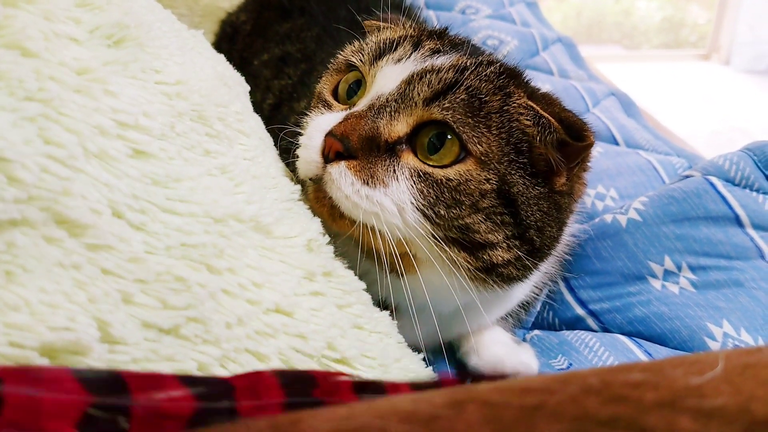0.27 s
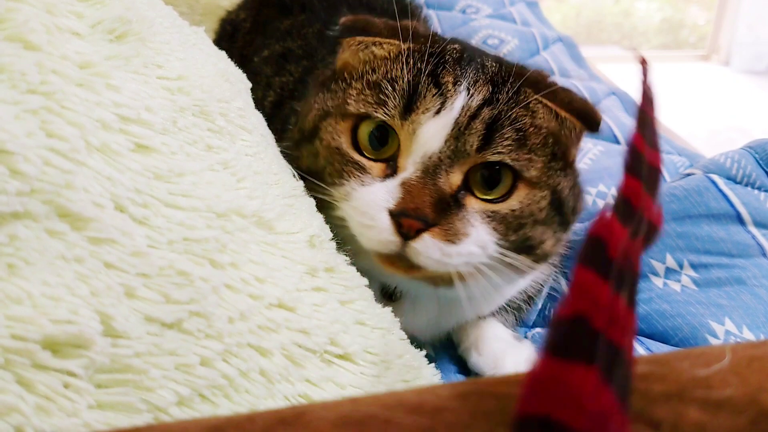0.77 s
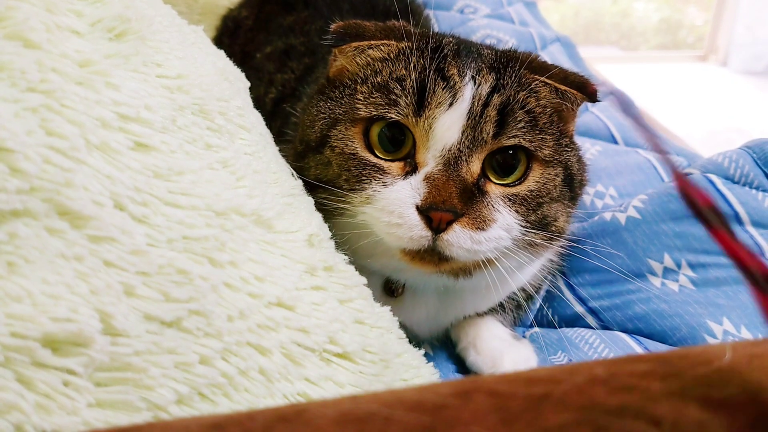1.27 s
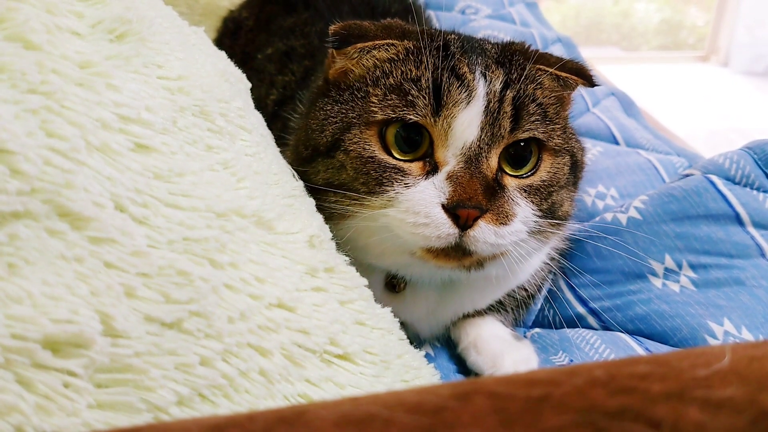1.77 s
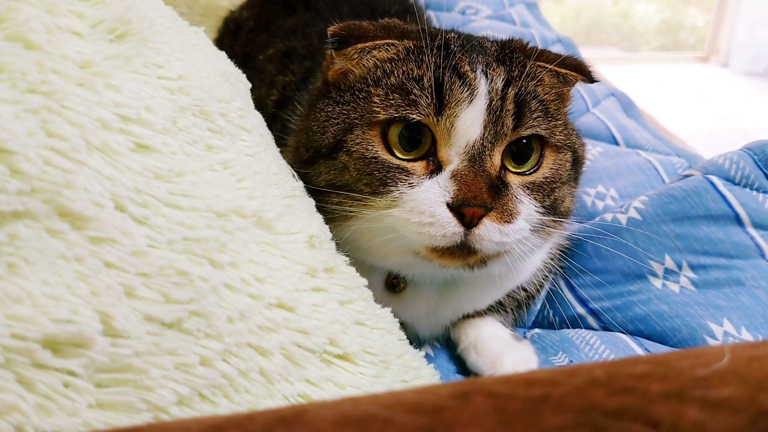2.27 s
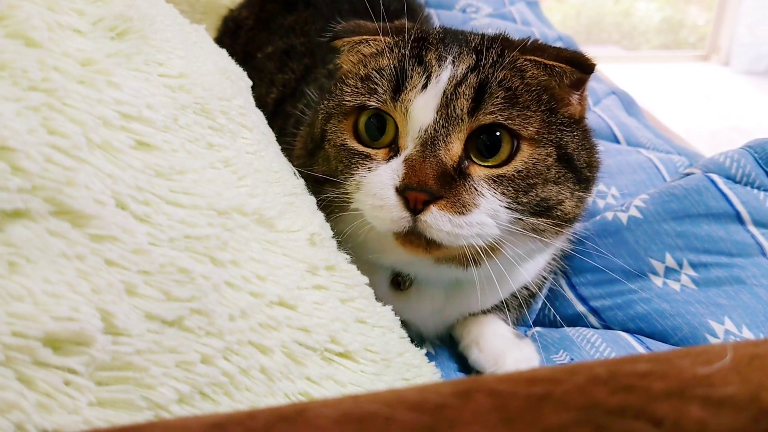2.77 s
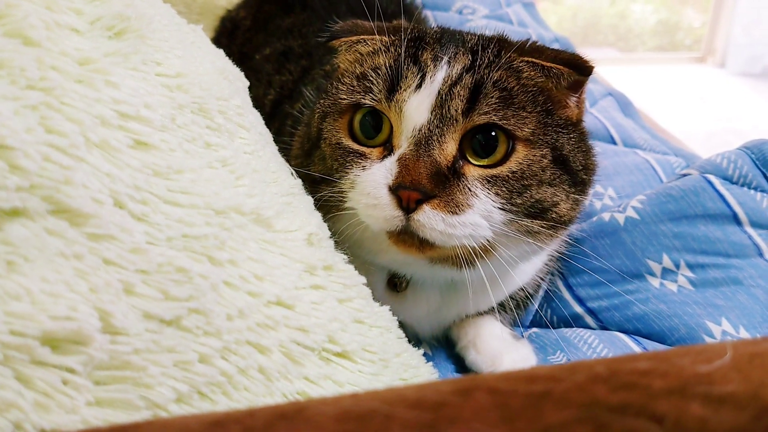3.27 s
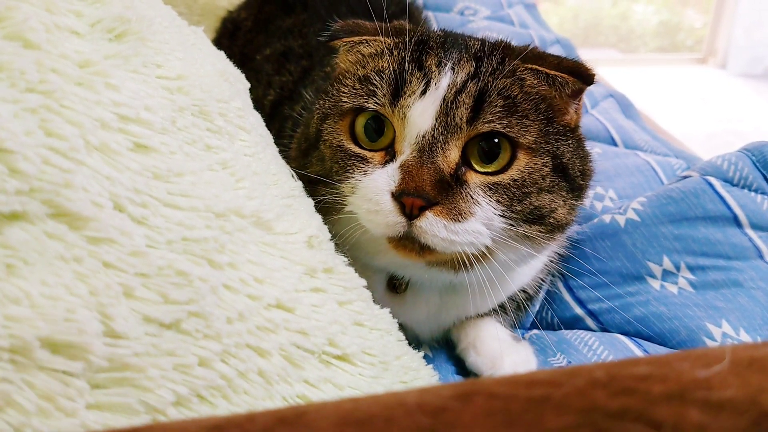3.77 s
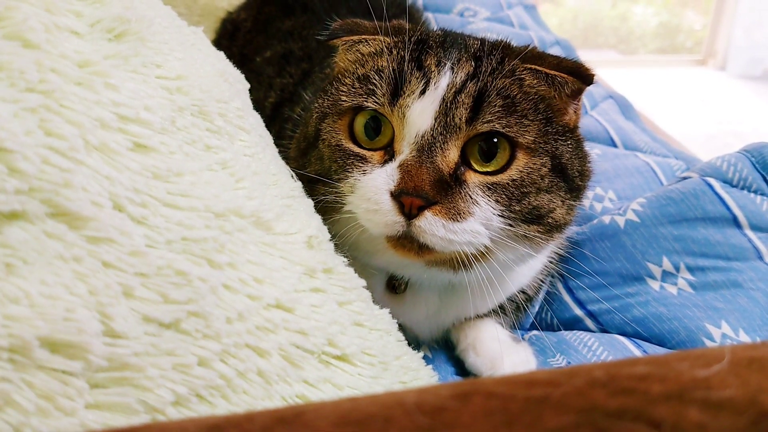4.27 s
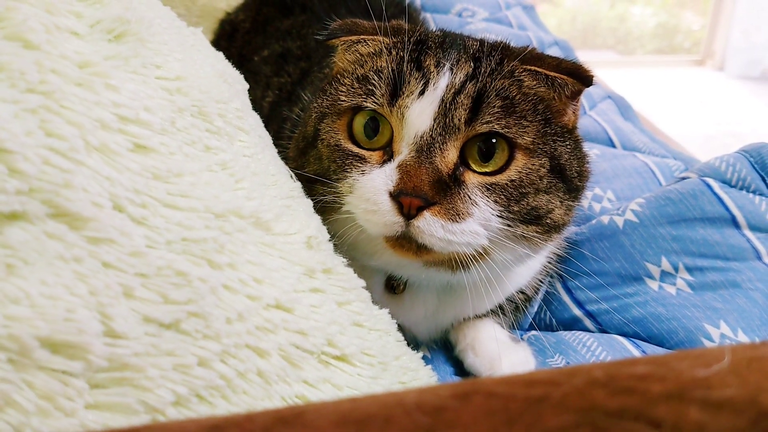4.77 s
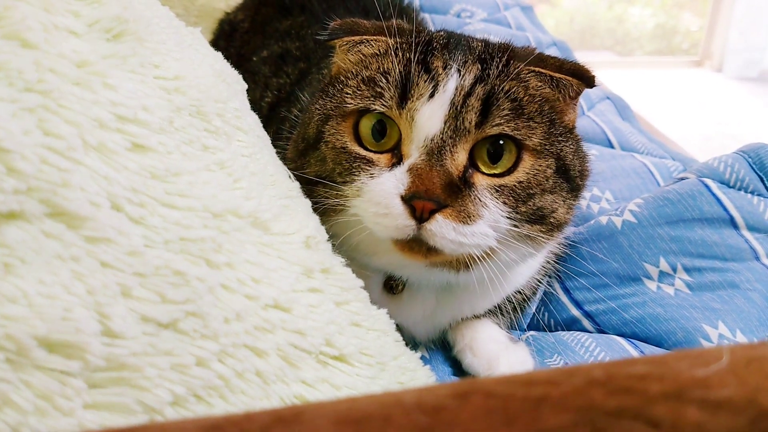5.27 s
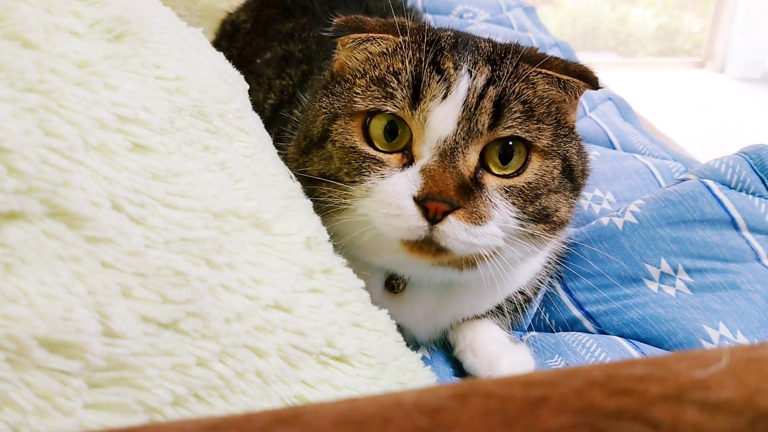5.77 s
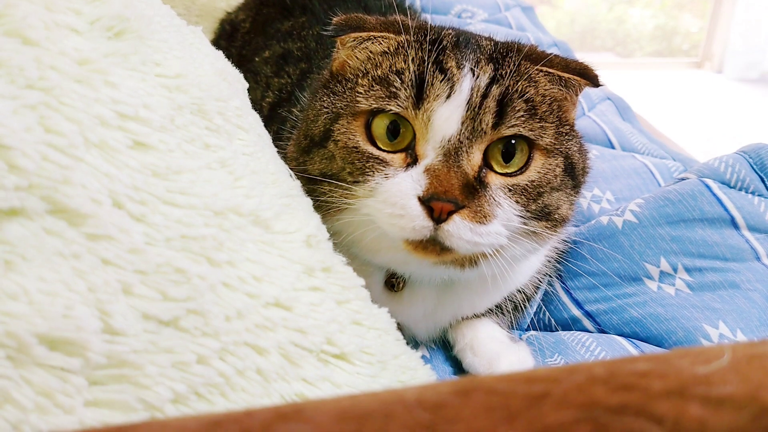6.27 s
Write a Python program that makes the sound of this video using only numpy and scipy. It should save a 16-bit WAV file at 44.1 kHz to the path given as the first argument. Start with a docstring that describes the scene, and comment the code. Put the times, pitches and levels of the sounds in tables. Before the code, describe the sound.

A fabric teaser on a wand is whipped in front of a cat, very close and to the right of a stereo microphone. A tiny slotted bell rattles in thin, high bursts from the start. Soft swishes lead to a sharp snap, then a quiet pause; further flurries bring two louder cracks with air puffs and harder bell blows. Finally the pellet ticks weakly to rest in a quiet, soft-furnished room.

```python
"""A cloth teaser with a slotted bell is whipped about in front of a cat, close to the right of a microphone.
From the start the bell rattles: its pellet excites decaying shell modes, then rolls or ticks as it rests.
Swishes of shaped noise swell and fade; near 1.6 s the tip snaps: a millisecond crack with a scattered tail.
A second loud snap follows near 3.8 s and a third near 5.3 s, amid puffs of air and the hardest bell blows.
Last, the pellet ticks to rest. Steady room noise and faint tones lie beneath, with swells of a low drone."""
import sys
import numpy as np
from scipy import signal
from scipy.fft import rfft, irfft
from scipy.io import wavfile
from scipy.ndimage import uniform_filter1d

SR = 44100
rng = np.random.default_rng(int(sys.argv[2]) if len(sys.argv) > 2 else 0)


def int16_out(signal):
    """Quantize to a 16-bit WAV file."""
    q = np.round(np.clip(np.atleast_2d(signal).T, -1, 1) * 32767)
    wavfile.write(sys.argv[1], SR, q.astype(np.int16))


N = 287532
TIME = np.arange(N) / SR

# swings of the cloth: nearest t/s, approach half width/s, retreat half width/s, left level/dB, right level/dB
CLOTH_SWINGS = [(.1, .2, 0.26, -77, -74.5), (.55, 0.35, 0.7, -75.5, -67),
                (0.969, 0.092, 0.028, -64.5, -60.5), (1.42, 0.13, 0.1, -72.5, -60),
                (1.57, 0.069, 0.016, -77, -52.5), (1.71, 0.04, 0.039, -76, -62.5),
                (2.712, 0.026, 0.015, -59, -42), (2.735, .025, 0.045, -57, -58.5),
                (2.89, 0.022, 0.058, -74, -66.5), (3.72, .015, 0.038, -57, -59.5),
                (3.78, 0.034, 0.043, -72, -50.5), (3.9, .05, 0.13, -74, -73),
                (4.415, 0.0084, .012, -77, -79), (4.867, 0.026, 0.017, -58, -43.5),
                (4.9, 0.043, 0.066, -60.5, -61), (5.04, 0.013, 0.027, -65.5, -59.5),
                (5.236, 0.044, 0.027, -58, -65.5), (5.275, 0.027, 0.03, -59.5, -47),
                (5.4, 0.033, 0.061, -71.5, -66), (6.39, 0.016, 0.018, -85, -69),
                (6.47, 0.014, 0.017, -79, -67.5)]
# spectrum of cloth turbulence, before scaling to the swing levels: f/Hz, left level/dB, right level/dB
SWISH_SPECTRUM = [(150, 13.5, -9), (620, 16.5, 1.5), (1670, 5.5, -6), (2510, 8, 7), (3420, 8.5, 0.5),
                  (4560, 11.5, 3.5), (5560, -11.5, 4), (6670, -7, 9), (7380, -12, -7), (8600, -49, -15),
                  (8400, -33, -4), (10000, 2.5, -1.5), (13000, 7, -6), (15700, 0, -4)]


def swish(flutter_rate_hz=170, flutter_db=1.4, fibre_rate_hz=2200, fibre_db=-4):
    """Turbulent noise: air and sparse fibre impulses share a spectrum, and the swings add in power."""
    fibres = (rng.random(N) < fibre_rate_hz / SR) * rng.standard_normal(N)
    source = rng.standard_normal((2, N)) + undb(fibre_db) * fibres / fibres.std()
    air = colour(source, SWISH_SPECTRUM)
    # the swing levels refer to the 2-7 kHz band
    band = signal.butter(2, [2000, 7000], "band", fs=SR, output="sos")
    presence = signal.sosfilt(band, air)
    power = np.zeros((2, N))
    for s, approach, retreat, left_db, right_db in CLOTH_SWINGS:
        power += (undb([[left_db], [right_db]]) * swell(s, approach, retreat)) ** 2
    flutter = undb(flutter_db * walk(flutter_rate_hz))
    return air / presence.std(1, keepdims=True) * np.sqrt(power) * flutter


# snaps, flaps and ticks of the cloth: t/s, crack level/dB, body below 1.5 kHz/dB, relative tail level/dB
CLOTH_SNAPS = [(0.465, -58, -2, 0), (0.55, -63, -12, -17), (1.5807, -23.5, -3, -10.5),
               (2.706, -35, -8, -15), (2.7147, -39, -15, 1), (2.739, -55, 9, -10), (2.751, -39, 21, -4),
               (3.789, -14, 3, -18.5), (4.419, -58, -10, -6), (4.8943, -35, -6, -13),
               (5.2748, -12.5, 1.5, -16.5), (6.39, -56, -8, -15), (6.469, -52, -7, -8.5)]
# spectrum of the crack, before scaling to its level: f/Hz, left level/dB, right level/dB
SNAP_SPECTRUM = [(100, -23, -24), (407, -31, -6), (794, -17, 0.5), (1830, -26, -5), (2340, -44, 6),
                 (2820, -39, 4.5), (3770, -40, -5.5), (4250, -35.5, -9.5), (4707, -51, -23.5),
                 (5700, -37, -9.5), (6700, -44, 7), (7100, -50, -18), (10200, -49, -16.5),
                 (15500, -44, -11.5)]


def snaps(crack_s=0.0011, tail_t60=0.054, size=4096):
    """Impulsive radiation: the tip turns over in a brief broadband crack, and nearby surfaces scatter it."""
    out, t = np.zeros((2, N)), TIME[:size]
    crack_samples = crack_s * SR
    for s, db, body_db, tail_db in CLOTH_SNAPS:
        crack = rng.standard_normal(size) * (t < crack_s)
        for _ in range(12):  # alternate a flat spectrum with a short duration
            flat = irfft(np.exp(1j * np.angle(rfft(crack))))
            crack = flat * (t < crack_s)
        tail = rng.standard_normal(size) * fade(t, tail_t60) * undb(tail_db) / np.sqrt(crack_samples)
        tone = []
        for hz, left_db, right_db in SNAP_SPECTRUM:
            body = body_db * (hz < 1500)
            tone.append((hz, left_db + body, right_db + body))
        direct = signal.fftconvolve(crack[None], response(tone), axes=1)
        scattered = signal.fftconvolve(tail[None], response(SWISH_SPECTRUM), axes=1) * undb([[-22], [-3]])
        direct_rms = np.sqrt(np.sum(direct ** 2) / crack_samples)
        add(out, s, (direct + scattered) * undb(db) / direct_rms)
    return out


# puffs of air on the microphone ports: t/s, width/s, left level/dB, right level/dB, relative buffeting/dB
AIR_PUFFS = [(1.59, 0.00562, -51, -40.5, -19), (2.754, 0.011, -23.5, -44, -30.5),
             (3.716, 0.0024, -32, -50, -12), (3.75, 0.021, -36, -58, -16), (3.794, 0.0031, -58, -35, -16),
             (4.9, 0.011, -26, -43, -38), (4.938, 0.011, -41.5, -60, -4.5), (5.148, 0.0025, -37, -51, -19),
             (5.256, 0.012, -34, -47, -21.5), (5.281, 0.0038, -57, -32, -12)]


def puffs(buffet_hz=170):
    """Near-field pressure: passing cloth sucks, pushes and sucks again at the ports, among low eddies."""
    out = np.zeros((2, N))
    low_pass = signal.butter(2, buffet_hz, fs=SR, output="sos")
    eddies = signal.sosfilt(low_pass, rng.standard_normal((2, N)))
    eddies /= eddies.std()
    for s, width, left_db, right_db, buffet_db in AIR_PUFFS:
        u = (TIME - s) / width
        push = (1 - u ** 2) * np.exp(-u ** 2 / 2)
        buffeting = undb(buffet_db) * eddies * np.exp(-(u / 3) ** 2 / 2)
        out += undb([[left_db], [right_db]]) * (push + buffeting)
    return out


# hard single blows of the pellet: t/s, relative level/dB, brightness/dB, left minus right/dB
HARD_BLOWS = [(.0778, -30, 5, -11), (0.249, -40, 7, -9), (.334, -43, -14, -8), (.6763, -42.5, -5, -13),
              (.987, -34.5, -9, -20), (1.067, -36, -22, -21), (1.1186, -44.5, -18, -22),
              (1.663, -33, -22, -24), (1.737, -43, -4, -17), (2.8026, -28.5, -5, -11),
              (2.8925, -27.5, 9, -10), (2.907, -32.5, -2, -16), (3.0486, -31, -9, -12),
              (3.0853, -39, -9, -13), (3.844, -33.5, -7, -13), (4.895, -34, 3, -14),
              (4.9619, -32.5, -8, -7), (5.0358, -29.5, 2, -7.5), (5.1904, -19.5, -9, -12),
              (5.257, -26.5, 8, -13), (5.2935, -14.5, -12, -21.5), (5.3066, -22.5, -3.5, -9),
              (5.402, -20.5, -11, -11), (5.4083, -22.5, -21, -20), (5.4463, -34, -8, -8),
              (5.462, -27, -20, -14), (5.561, -45.5, -11, -18)]
# jolts that set the pellet rattling: t/s, length/s, relative level/dB, brightness/dB, left minus right/dB
BELL_JOLTS = [(0, 0.039, -33.5, -8, -14), (.063, 0.029, -38.5, -5, -6), (0.11, 0.065, -37.5, -10, -7),
              (0.216, 0.058, -37, -1, -9), (.345, .06, -36.5, -7, -9), (0.456, 0.024, -44.5, 0, -5),
              (0.515, 0.035, -43, -9, -6), (0.65, 0.024, -49, -1, -8), (0.722, 0.098, -47.5, -13, -13),
              (1.04, 0.06, -42.5, -22, -25), (1.619, 0.088, -35.5, -10, -29), (2.74, 0.046, -48, -5, -13),
              (2.806, 0.025, -31.5, -2, -18), (2.886, 0.045, -29.5, 3, -13), (2.985, 0.036, -36, -3, -10),
              (3.692, .04, -38, -14, -4), (3.736, 0.034, -28.5, -4, -8), (3.823, 0.037, -35, -7, -15),
              (3.886, .03, -35, -7, -17), (4.805, 0.039, -31, -12, -14), (4.85, .14, -42.5, -5, -10),
              (5.032, 0.038, -35.5, -2, -15), (5.127, .025, -40, -4, -16), (5.183, .025, -29.5, -6, -14),
              (5.243, 0.032, -29.5, -2, -5), (5.31, 0.015, -26, -3, -10), (5.383, 0.022, -30, -7, -10),
              (5.452, 0.04, -38, -5, -11)]
RATTLE_SAG_DB = 7.5  # loss from the start of a rattle to its end


def jingle(level_db=1, rattle_db=-1, bright_spread_db=2.5, first_blow_db=-2, muted_t60=0.18, hard_t60=.3,
           rebound_s=0.0093, rebound_spread_db=3):
    """Repeated impact: each jolt throws the pellet to and fro at uneven gaps; hard blows ring longer."""
    out, t = np.zeros((2, N)), TIME[:SR // 5]
    for s, db, bright_db, pan_db in HARD_BLOWS:
        add(out, s, undb(db + level_db) * strike(bright_db, pan_db) * fade(t, hard_t60))
    for start, length, db, bright_db, pan_db in BELL_JOLTS:
        age = 0
        while age < length:
            blow_db = db + rattle_db + first_blow_db * (age == 0) - RATTLE_SAG_DB * age / length
            blow_db += rebound_spread_db * rng.standard_normal()
            blow_bright_db = bright_db + bright_spread_db * rng.standard_normal()
            ring = strike(blow_bright_db, pan_db) * fade(t, muted_t60)
            add(out, start + age, undb(blow_db) * ring)
            age += rebound_s * rng.uniform(.3, 1.7)
    return out


# modes of the shell before the pellet's damping: f/Hz, t60/s, relative level/dB, extra level on the left/dB
SHELL_MODES = [(8548, 0.025, 0.5, -1.5), (8410, 0.16, -20, -2), (8480, 0.18, -19.5, 3.5),
               (8640, 0.058, -35, -2), (7900, 0.052, -33.5, 6), (8755, 0.027, -13, -6),
               (8860, 0.043, -17, -12), (9240, 0.067, -24.5, 10), (9470, 0.16, -20.5, 7),
               (9630, 0.026, -14, 7.5), (10140, 0.043, -27.5, 3), (10460, 0.012, -21.5, 6),
               (10420, 0.027, -20, 2), (11670, 0.012, -29.5, 16.5)]
# relative spectrum of the contact click: f/Hz, left level/dB, right level/dB
CONTACT_SPECTRUM = [(2000, -15, -47), (4460, -5, -11), (5940, -11, -9), (6740, -19.5, -2.5), (7620, -25, 5),
                    (8600, -9, -2), (8700, 8, 16.5), (11340, 9, -2.5), (15730, 1.5, -11)]


def strike(bright_db, pan_db, scatter_db=3.0, usual_bright_db=-8, click_db=-12, click_t60=.02,
           contact_s=0.00023, mode_share=0.82, click_share=0.51, damping_db=3.7):
    """Modal excitation: one blow gives a contact click and decaying shell modes in a varying mix."""
    hz, t60, db, left_db = np.transpose(SHELL_MODES)
    t = TIME[:SR // 5]
    t60 = t60 * undb(damping_db * rng.standard_normal())  # the pellet mutes some blows more than others
    hard_db = bright_db - usual_bright_db
    upper = hz > 9000  # brightness lifts only these modes
    size = undb(db + upper * hard_db * mode_share + scatter_db * rng.standard_normal(len(hz)))
    phase = rng.uniform(0, 2 * np.pi, (2, len(hz)))
    side_gain = np.array([undb(left_db), np.ones(len(hz))])
    weight = size * side_gain * np.exp(1j * phase)
    decaying_modes = np.exp(np.outer(2j * np.pi * hz - np.log(1000) / t60, t))
    ring = (weight @ decaying_modes).imag
    contact = rng.standard_normal((2, len(t))) * fade(t, click_t60)
    click = signal.fftconvolve(contact, response(CONTACT_SPECTRUM), axes=1)[:, :len(t)]
    click *= undb(click_db + click_share * hard_db)
    push = 1 - np.exp(-(t / contact_s) ** 2)  # the blow takes a moment to build
    return (ring + click) * push * undb([[pan_db], [0]]) / np.linalg.norm(size)


def rolling(rate_hz=450, level_db=-17, spread_db=3.0, pan_db=-12, bright_db=-6, damped_t60=0.31):
    """Random excitation: many tiny contacts of the skittering pellet drive one damped shell response."""
    contacts = (rng.random(N) < rate_hz / SR) * undb(spread_db * rng.standard_normal(N))
    ring = strike(bright_db, pan_db, scatter_db=0, damping_db=0)
    ring = ring * fade(TIME[:ring.shape[1]], damped_t60)
    drive = contacts / contacts.std() * agitation() * undb(level_db)
    return signal.fftconvolve(drive[None], 2 * ring / np.linalg.norm(ring), axes=1)[:, :N]


def agitation(attack_s=0.0084, roll_t60=0.13):
    """Energy build-up and decay: rolling starts just before a jolt, sags through it, then dies away."""
    power = np.zeros((1, N))
    for start, length, db, _, _ in BELL_JOLTS:
        begin = max(start - 3 * attack_s, 0)
        age = TIME[:SR // 2] + begin - start
        rise = np.exp(np.minimum(age, 0) / attack_s)
        sag = undb(db - RATTLE_SAG_DB * np.clip(age / length, 0, 1))
        release = fade(np.maximum(age - length, 0), roll_t60)
        add(power, begin, (rise * sag * release)[None] ** 2)
    return np.sqrt(power[0])


# pellet rocking to rest: from t/s, to t/s, first relative level/dB, last relative level/dB
PELLET_SETTLING = [(1.156, 1.4, -59, -61), (1.766, 1.997, -55, -76), (5.581, 6.35, -57.5, -70.5)]


def settling(tick_hz=8600, tick_t60=0.02, rocking_s=.033, spread_db=3.5, left_db=-16):
    """Damped oscillation: the rocking pellet gives ever weaker, short ticks at nearly even gaps."""
    out, t = np.zeros((2, N)), TIME[:SR // 20]
    tick = np.sin(2 * np.pi * tick_hz * t) * fade(t, tick_t60) * undb([[left_db], [0]])
    for start, end, first_db, last_db in PELLET_SETTLING:
        for s in np.arange(start, end, rocking_s):
            db = np.interp(s, [start, end], [first_db, last_db]) + spread_db * rng.standard_normal()
            add(out, s + rocking_s * rng.uniform(-0.44, 0.34), tick * undb(db))
    return out


def port_dip(x, dip_hz=7550, width_hz=700):
    """Band rejection: the microphone ports swallow a band just below the bell's lowest mode."""
    return signal.lfilter(*signal.iirnotch(dip_hz, dip_hz / width_hz, fs=SR), x)


def walls(x, t60, wet_db):
    """Diffuse reverberation: a small room full of bedding returns a weak, short decay of noise."""
    t = TIME[:SR // 2]
    echo = rng.standard_normal((2, len(t))) * fade(t, t60) * (t > .006)
    echo /= np.sqrt(np.sum(echo ** 2, axis=1, keepdims=True))
    return undb(wet_db) * signal.fftconvolve(x, echo, axes=1)[:, :N]


# swells of the drone: loudest t/s, half width/s, level/dB (the right side is lower)
LOW_SWELLS = [(.85, 0.22, -71), (2.9, 0.086, -67.5), (4.0, 0.41, -62.5), (4.55, 0.093, -65.5),
              (6.25, 0.092, -63.5)]


def drone(hz=213.6, wander_hz=3.55, waver_db=3, right_db=-5):
    """Frequency-modulated tone: a distant low note, to the left, that wanders, swells and fades."""
    phase = 2 * np.pi * np.cumsum(hz + wander_hz * walk(21)) / SR
    power = sum((undb(db) * swell(s, width, width)) ** 2 for s, width, db in LOW_SWELLS)
    level = np.sqrt(power) * undb(waver_db * walk(12))
    return np.sqrt(2) * np.sin(phase) * level * undb([[0], [right_db]])


# spectral density of the still room: f/Hz, left level per Hz/dB, right level per Hz/dB
AIR_DENSITY = [(20, -65, -64.5), (33.8, -72.5, -73), (72.3, -86, -85), (155.6, -87.5, -91),
               (286, -95.5, -99.5), (335, -83, -88), (488, -93.5, -94), (647, -86, -87), (671, -96, -94.5),
               (1094, -101, -97), (1670, -110, -105), (2360, -116, -100), (3250, -115, -109),
               (4700, -112, -103), (4930, -118, -108), (6440, -122, -107), (7070, -125, -124),
               (10900, -120, -121), (15900, -124, -124)]
# faint hum of the house, before a common trim: mean f/Hz, left level/dB, right level/dB
HOUSE_HUM = [(105, -71, -83), (153.8, -79.5, -86.5), (319.7, -76.5, -76), (351.5, -86.5, -83),
             (618, -75.5, -76.5), (1220, -105, -76), (4850, -98.5, -86), (6500, -100, -85.5)]


def room_air(shared_hz=1700, lowest_hz=19, hum_wander_hz=4, hum_waver_db=2, hum_trim_db=-2):
    """Partial coherence: steady noise is most alike on both sides in the bass; wavering hum is added."""
    hz = np.fft.rfftfreq(N, 1 / SR)
    likeness = np.clip(0.73 / (1 + (hz / shared_hz) ** 2), 0, 1)
    shared = np.sqrt(likeness) * rfft(rng.standard_normal(N))
    separate = np.sqrt(1 - likeness) * rfft(rng.standard_normal((2, N)))
    noise = colour(irfft(shared + separate, N), AIR_DENSITY)
    high_pass = signal.butter(2, lowest_hz, "high", fs=SR, output="sos")
    out = signal.sosfilt(high_pass, noise) * np.sqrt(SR / 2)  # turns level per Hz into amplitude
    for hum_hz, left_db, right_db in HOUSE_HUM:
        phase = 2 * np.pi * np.cumsum(hum_hz + hum_wander_hz * walk(25)) / SR
        level = undb(hum_trim_db + hum_waver_db * walk(26))
        out += np.sqrt(2) * np.sin(phase) * level * undb([[left_db], [right_db]])
    return out


def undb(db):
    """Logarithmic level: decibels to amplitude gain."""
    return 10 ** (np.asarray(db) / 20)


def add(out, s, sound):
    """Superposition: mix a sound in at time s."""
    i = max(int(s * SR), 0)
    out[:, i:i + sound.shape[1]] += sound[:, :N - i]


def gains(table, size):
    """Spectral envelope: stereo gain per bin, interpolated in level over log frequency."""
    hz, *sides = np.transpose(table)
    bins = np.log(np.maximum(np.fft.rfftfreq(size, 1 / SR), 1))
    return undb([np.interp(bins, np.log(hz), side) for side in sides])


def colour(x, table):
    """Linear filtering: shape a full-length sound by a stereo spectrum."""
    return irfft(rfft(x) * gains(table, N), N)


def response(table, size=512):
    """Minimum phase: folding the cepstrum gives a causal stereo impulse response."""
    cepstrum = irfft(np.log(gains(table, size)))
    cepstrum[:, 1:size // 2] *= 2
    cepstrum[:, size // 2 + 1:] = 0
    return irfft(np.exp(rfft(cepstrum)))


def walk(rate_hz):
    """Band-limited fluctuation: smoothed random steps with unit standard deviation."""
    k = max(int(SR / rate_hz), 1)
    steps = np.repeat(rng.standard_normal(N // k + 1), k)[:N]
    smooth = uniform_filter1d(uniform_filter1d(steps, k), k)
    return smooth / smooth.std()


def fade(t, t60):
    """Exponential decay: the level falls by 60 dB in t60 seconds."""
    return np.exp(-np.log(1000) * t / t60)


def swell(s, rise_s, fall_s):
    """Lorentzian envelope: gain peaks at time s and halves at one rise or fall time from it."""
    u = (TIME - s) / np.where(TIME < s, rise_s, fall_s)
    return 1 / (1 + u ** 2)


def scene():
    """Superposition: cloth and bell, each with its reverberation, over the quiet room."""
    cloth = swish() + snaps()
    around = cloth + walls(cloth, t60=0.067, wet_db=-32.5) + puffs() + room_air() + drone()
    bell = port_dip(rolling() + jingle() + settling()) * undb(-0.5)
    return around + bell + walls(bell, t60=0.25, wet_db=-18)


def record(dry, top_hz=15700):
    """Band limiting: the recorder's steep low-pass filter cuts the top."""
    return signal.sosfilt(signal.ellip(10, .2, 60, top_hz, fs=SR, output="sos"), dry)


dry = scene()
out = record(dry)
int16_out(out)
```